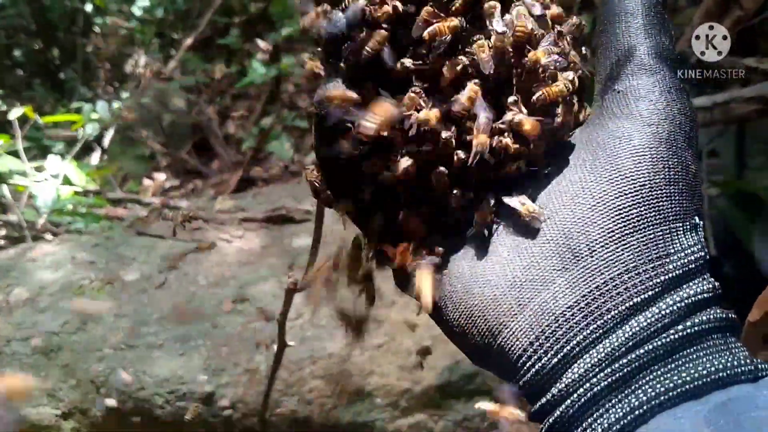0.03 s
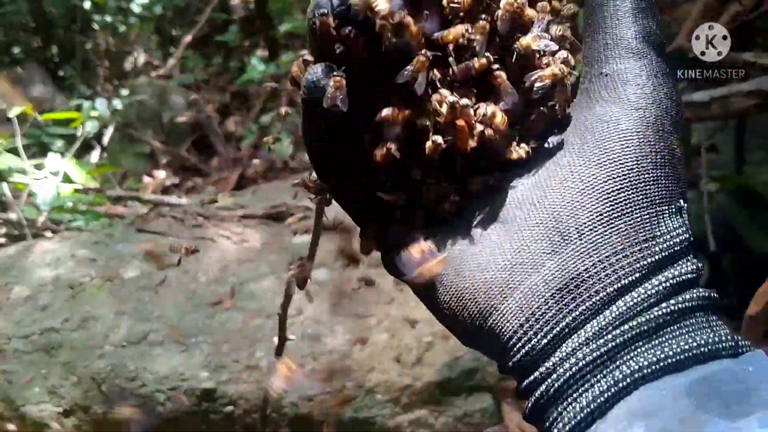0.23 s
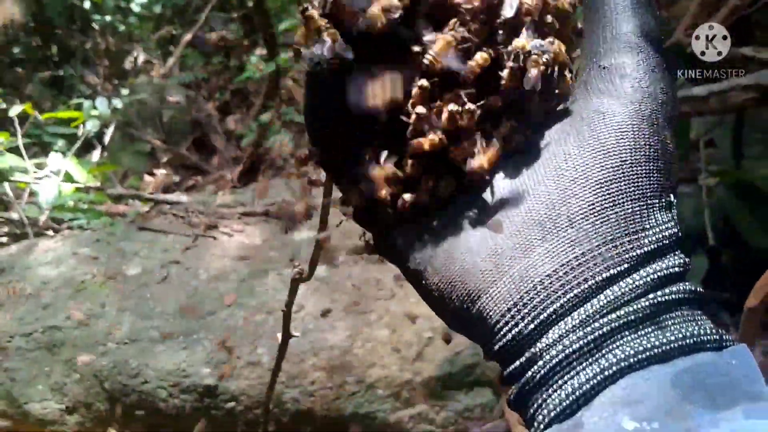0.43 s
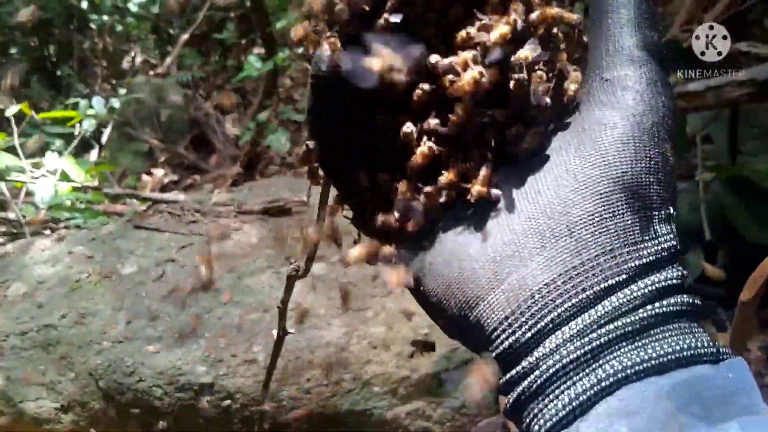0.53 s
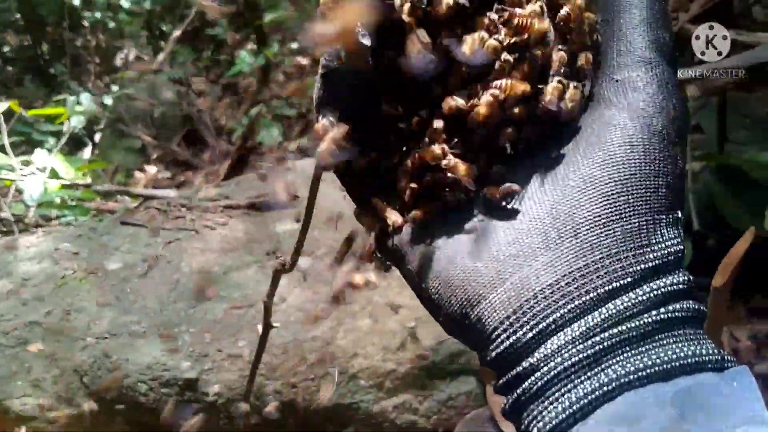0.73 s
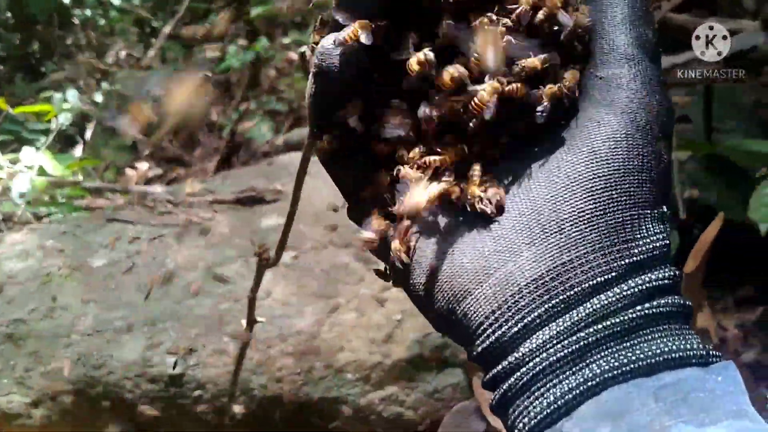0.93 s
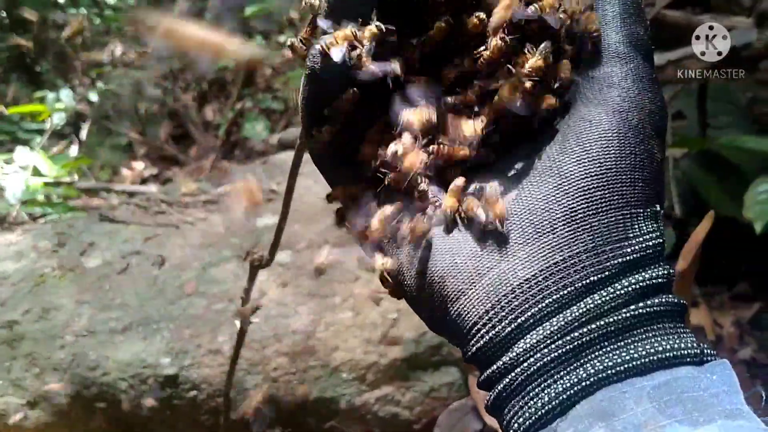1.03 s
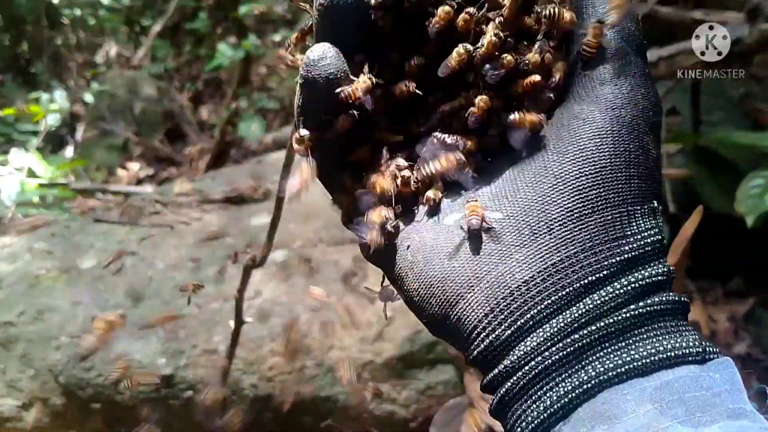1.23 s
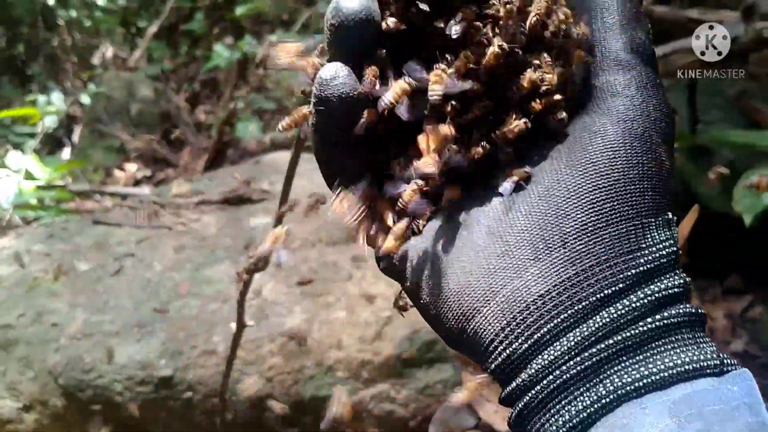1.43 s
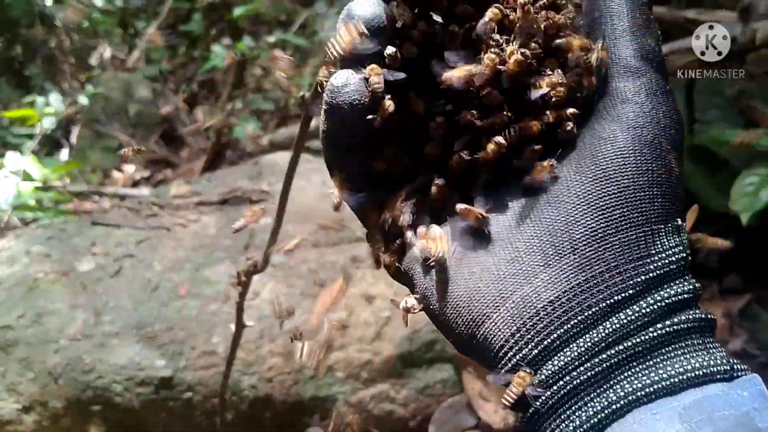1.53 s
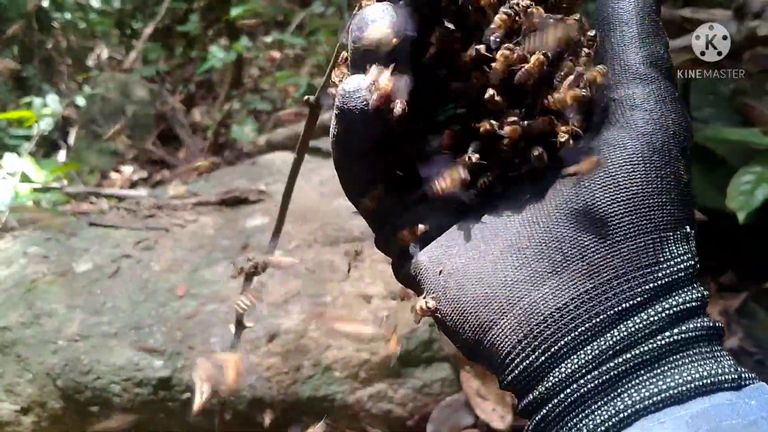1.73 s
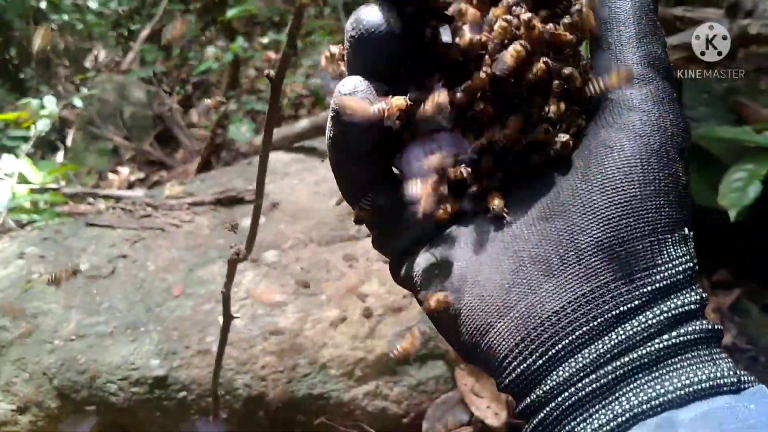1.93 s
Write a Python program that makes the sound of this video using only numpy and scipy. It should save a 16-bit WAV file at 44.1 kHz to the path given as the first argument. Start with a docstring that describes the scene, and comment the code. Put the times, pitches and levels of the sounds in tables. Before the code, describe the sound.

A swarm of honeybees buzzes steadily close to the microphone in a forest. Near the start, one bee shoots past with a loud, brief bump. Others swell and fade over a faint hiss and thin insect whine.

```python
"""Honeybee swarm in a forest

Bees buzz around a cluster held in a gloved hand. Each wingbeat radiates a harmonic series, and
many unequal wingbeats merge into a drone. One bee shoots past the microphone, and its wake bumps
the diaphragm. Behind them are a faint high hiss and the thin whine of two insects in the trees."""
import sys
import numpy as np
from scipy.fft import rfft, irfft, next_fast_len
from scipy.io import wavfile
from scipy.ndimage import map_coordinates

SR = 44100
rng = np.random.default_rng(int(sys.argv[2]) if len(sys.argv) > 2 else 0)


def wav_out(sig):
    """Save sig, one row per channel (or a flat mono array), as 16-bit PCM at SR to the path in sys.argv[1]."""
    wavfile.write(sys.argv[1], SR, np.round(np.clip(np.atleast_2d(sig).T, -1, 1) * 32767).astype(np.int16))


N = 88200
TIME = np.arange(N) / SR
FLUTTER_HZ = 2.5  # fast jitter of a bee's wingbeat


def amp(db):
    """Amplitude grows tenfold for every 20 dB."""
    return 10 ** (np.asarray(db) / 20)


def unit(x):
    """Normalisation to rms 1."""
    return x / np.sqrt(np.mean(x ** 2) + 1e-20)


def along(spectrum, hz):
    """Interpolation of (frequency [Hz], level [dB]) rows on a logarithmic frequency axis."""
    knots_hz, levels_db = np.transpose(spectrum)
    return np.interp(np.log(hz + 1), np.log(knots_hz + 1), levels_db)


def curve(rows):
    """Linear interpolation of (time [s], value) rows at every sample."""
    return np.interp(TIME, *np.transpose(rows))


def wobble(per_s):
    """Smooth random modulation: a spline through per_s Gaussian knots a second."""
    return map_coordinates(rng.standard_normal(size=4096), [TIME * per_s], mode="wrap")


def filtered(x, response):
    """Linear filtering multiplies the spectrum by a frequency response."""
    size = next_fast_len(N + SR // 2)
    hz = np.fft.rfftfreq(size, 1 / SR)
    return irfft(rfft(x, size) * response(hz), size)[:N]


def noise(spectrum):
    """Spectral shaping colours white noise; the result has rms 1."""
    return unit(filtered(rng.standard_normal(N), lambda hz: amp(along(spectrum, hz))))


def buzz(hz, harmonics, size=1024):
    """Fourier synthesis: (harmonic number, level [dB]) rows form a cycle of rms 1, repeated at hz."""
    phase = np.arange(size) / size
    cycle = sum(amp(db) * np.sin(2 * np.pi * (k * phase + rng.random())) for k, db in harmonics)
    return np.interp(np.cumsum(hz) / SR, phase, unit(cycle), period=1)


def forest_hiss():
    """Steady air and a far, flickering insect chorus add incoherently to broadband noise."""
    # spectrum of the hiss (frequency [Hz], relative spectral density [dB])
    spectrum = [(30, -25), (60, -4), (120, 10), (160, 16), (310, 17), (600, 16), (2000, 2), (4200, -0.25),
                (6800, 0.5), (7650, 6), (7900, 2), (8050, 7), (8650, 11), (9300, 6.5), (10500, 1),
                (11400, 1), (12000, 10), (12400, -4), (13200, -3), (14200, 4), (15400, 8.5)]
    # envelope of the hiss (time [s], relative level [dB])
    envelope = [(0, -57), (.21, -57), (.24, -51.5), (.29, -54.5), (.4, -56.5), (.8, -57.5), (.95, -56.5),
                (1.1, -56.5), (1.45, -58.5), (1.62, -56.7), (1.8, -58), (2, -58)]
    gain_db, flicker_db = 6, 0.84
    return amp(curve(envelope) + gain_db + flicker_db * wobble(55.16)) * noise(spectrum)


def whine(pitch, envelope, tone, waver_hz, flicker_db):
    """Random amplitude and frequency modulation make a held note stutter and waver."""
    stutter_db = flicker_db * (wobble(22.23) + wobble(90))
    hz = curve(pitch) + waver_hz * wobble(300)
    return amp(curve(envelope) + stutter_db) * buzz(hz, tone)


def tree_insects():
    """Two insects whine: a high fundamental spaces the harmonics widely, so each note is thin."""
    # fundamental of each insect (time [s], frequency [Hz])
    pitch_a = [(.2, 2891), (.85, 2899), (1.3, 2920), (2, 2934)]
    pitch_b = [(1.8, 2835), (2, 2837)]
    # envelope of each whine (time [s], level [dB])
    envelope_a = [(0, -70), (.17, -80), (.31, -62), (.4, -73), (.6, -69), (.8, -59), (.95, -61),
                  (1.15, -58.5), (1.35, -54), (1.47, -65), (1.6, -59.5), (1.8, -63), (2, -69)]
    envelope_b = [(1.75, -95), (1.84, -68), (1.91, -56), (2, -53)]
    # partials of each whine (harmonic number, relative level [dB])
    tone_a = [(3, -13), (4, -3.5)]
    tone_b = [(1, -19), (3, -1), (4, 2)]
    # the first insect's lowest partial, steadier than its overtones (time [s], level [dB])
    whistle_a = [(0, -78), (.7, -70), (1.05, -61.5), (1.3, -60.5), (1.501, -61.5), (1.68, -59), (1.76, -71),
                 (2, -66)]
    near_sine = [(0.92, 0)]  # a sine cycle cut short, which adds faint overtones
    return (whine(pitch_a, envelope_a, tone_a, waver_hz=6.5, flicker_db=2.5)
            + whine(pitch_a, whistle_a, near_sine, waver_hz=4.5, flicker_db=1.8)
            + whine(pitch_b, envelope_b, tone_b, waver_hz=0.93, flicker_db=4.5))


def tick(at_s=0.951, level_db=-50, half_length_s=0.0029):
    """A broadband transient: white noise a few milliseconds long is heard as a tiny dry tick."""
    envelope = np.exp(-((TIME - at_s) / half_length_s) ** 2)
    return amp(level_db) * envelope * rng.standard_normal(N)


def wing_harmonics(hz, tilt_db=0, count=19):
    """A periodic wing stroke radiates at whole multiples of its rate; tilt_db is per octave."""
    # spectral envelope of the wingbeat (frequency [Hz], relative level [dB])
    spectrum = [(150, 0.5), (230, 1), (420, 0.5), (500, -2), (560, -8.5), (640, -11), (900, -9.5),
                (1180, -7.5), (1500, -13.5), (2100, -17), (2900, -21), (3500, -26), (4200, -49)]
    k = np.arange(count) + 1
    return zip(k, along(spectrum, k * hz) + tilt_db * np.log2(k))


def swarm(count=24):
    """Superposition: wingbeats of unequal, wandering rate merge as bees swoop nearer and away."""
    # envelope of the swarm (time [s], relative level [dB])
    envelope = [(0, -42.5), (.15, -43), (.3, -41.5), (.55, -42.5), (.9, -42.5), (1.05, -44), (1.3, -43.5),
                (1.6, -43.5), (2, -43.5)]
    mean_hz, spread_hz, wander_hz = 226.76, 16, 13
    gain_db, swoop_db = 1.72, 2
    total = np.zeros(N)
    for rank in (np.arange(count) + 0.5) / count:
        own_hz = mean_hz + spread_hz * np.log(rank / (1 - rank)) / np.sqrt(np.pi)  # logistic spread
        hz = own_hz + wander_hz * wobble(11) + FLUTTER_HZ * wobble(60)
        total += amp(swoop_db * wobble(10.98)) * buzz(hz, wing_harmonics(own_hz))
    return amp(curve(envelope) + gain_db) * unit(total)


def swooping_bees(sag_hz_per_s=70):
    """Sound pressure falls with distance, so each near bee swells and fades while its pitch sags."""
    # close approaches (time [s], wingbeat [Hz], level [dB], half length [s], tilt [dB/octave])
    swoops = [(0.015, 239.4, -46, .025, -27), (0.143, 220, -44, .03, -2.5), (0.496, 226.1, -43, .03, -3),
              (0.607, 239.4, -40, 0.039, -4), (.8, 237, -37, 0.0494, -10.5), (0.908, 215, -40, .04, -10.5),
              (1.15, 230.3, -42, 0.0248, -15), (1.295, 236, -41.5, 0.011, -1),
              (1.555, 229, -46.5, .06, -13.5), (1.79, 211.9, -39.5, .035, -11),
              (1.978, 244.5, -44, .03, -6)]
    total = np.zeros(N)
    for at_s, wing_hz, db, half_s, tilt_db in swoops:
        travel = (TIME - at_s) / half_s
        hz = wing_hz - sag_hz_per_s * half_s * np.tanh(travel) + FLUTTER_HZ * wobble(39.55)
        swell = (1 + travel ** 2 / 2) ** -2
        total += amp(db) * swell * buzz(hz, wing_harmonics(wing_hz, tilt_db))
    return total


def wake():
    """Each eddy behind the passing bee is a pressure pulse that pushes and pulls the diaphragm."""
    # eddies at the microphone (time [s], frequency [Hz], peak level [dB], half length [s])
    eddies = [(.255, 178, -16, 0.015), (.267, 479, -16.5, 0.0059), (.269, 310, -6.5, 0.0039),
              (0.279, 118, -7.5, 0.0077), (0.29, 105, -20, 0.007)]
    total = np.zeros(N)
    for at_s, hz, db, half_s in eddies:
        t = TIME - at_s
        total += amp(db) * np.exp(-(t / half_s) ** 2) * np.cos(2 * np.pi * hz * t)
    return total


def passing_bee():
    """Near-field hum swells steeply with closeness; directivity throws the rasping edge ahead of it."""
    # partials of the wingbeat (harmonic number, relative level [dB])
    tone = [(1, 6), (2, 2.5), (3, -17), (4, -15), (5, -17), (6, -25), (7, -28), (8, -27), (9, -32),
            (10, -32.5), (11, -32), (12, -43), (13, -42), (14, -43), (15, -61), (16, -46.5)]
    # air torn by the wings (frequency [Hz], relative spectral density [dB])
    rasp_spectrum = [(40, -33), (150, -4), (300, 0.5), (550, 3.5), (780, 2.5), (1000, -20), (1400, -8),
                     (2000, -38), (3300, -23.5), (4200, -41), (9000, -45)]
    closest_s, crossing_s = 0.2608, 0.014  # crossing: the time to fly its miss distance
    wing_hz, climb = 221.5, 0.025  # it beats faster to veer away
    hum_gain_db, edge_gain_db = -10.5, -29
    edge_lead_s, edge_width_s = 0.0026, 0.018

    t = TIME - closest_s
    travel = t / crossing_s
    closeness = 1 / np.hypot(1, travel)
    hz = wing_hz * (1 + climb * travel * closeness) + 3 * wobble(197.2)
    near_field, far_field = closeness ** 3.13, 0.089 * closeness
    hum = (near_field + far_field) * buzz(hz, tone[:2])

    strokes = 1 + 0.74 * buzz(hz, [(0.92, 0)])  # the rasp pulses once per wingbeat
    edge = buzz(hz, tone[2:]) + strokes * noise(rasp_spectrum)
    facing = np.exp(-((t + edge_lead_s) / edge_width_s) ** 2) + 0.099 * closeness
    return amp(hum_gain_db) * hum + amp(edge_gain_db) * facing * edge


def scene():
    """Sound pressures add linearly at one microphone: bees in front, the forest behind."""
    insects = tree_insects()
    bees = swarm() + swooping_bees() + passing_bee() + wake()
    return (bees + tick() + forest_hiss() + insects)[None]


def record(dry):
    """Band limiting: an ideal low-pass filter removes the highest treble."""
    cutoff_hz = 15500
    return filtered(dry[0], lambda hz: hz < cutoff_hz)[None]


dry = scene()
out = record(dry)
wav_out(out)
```